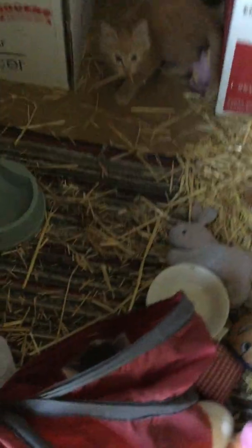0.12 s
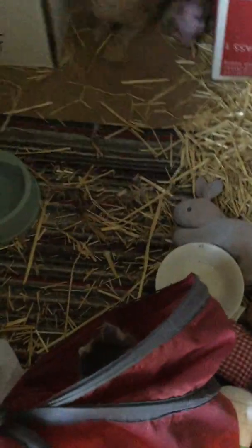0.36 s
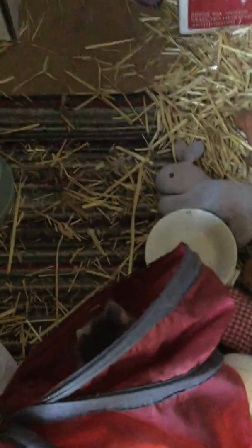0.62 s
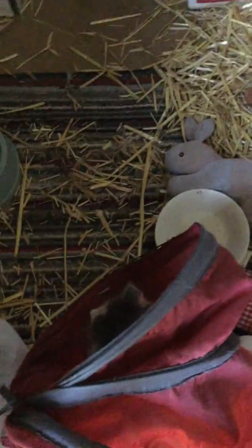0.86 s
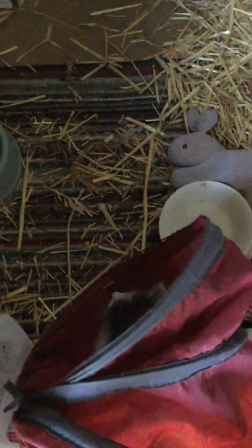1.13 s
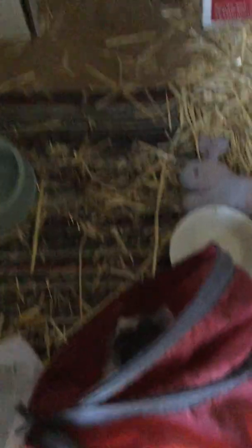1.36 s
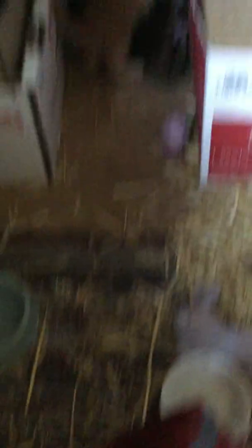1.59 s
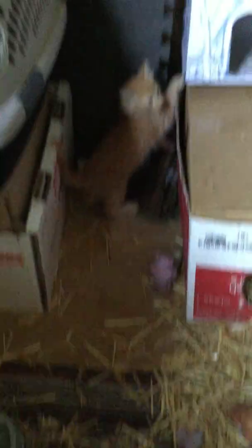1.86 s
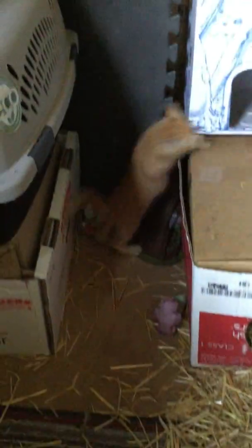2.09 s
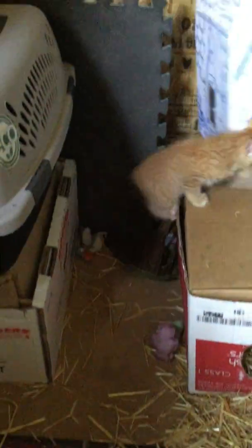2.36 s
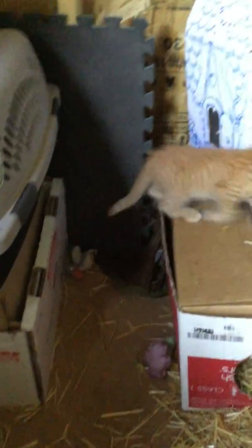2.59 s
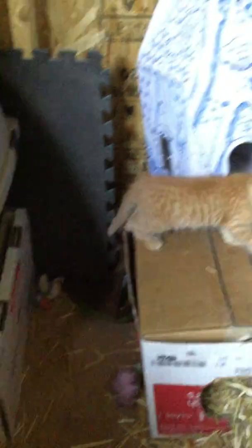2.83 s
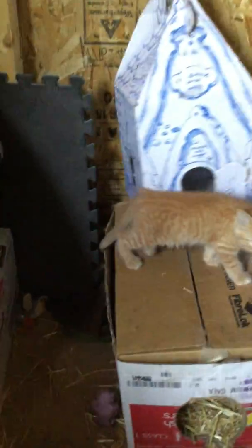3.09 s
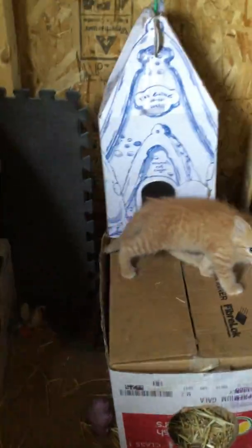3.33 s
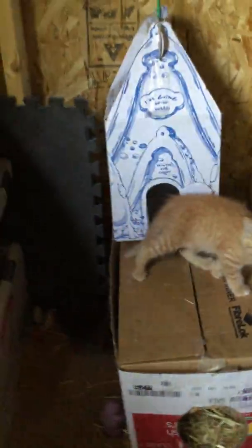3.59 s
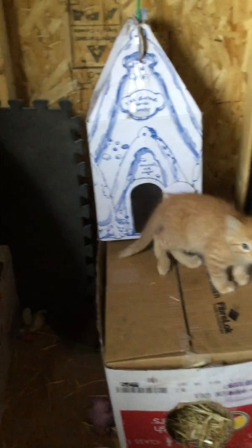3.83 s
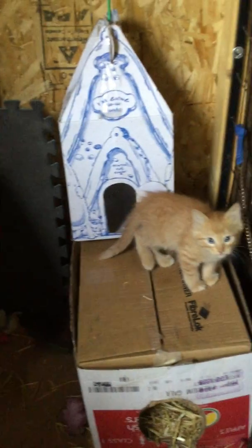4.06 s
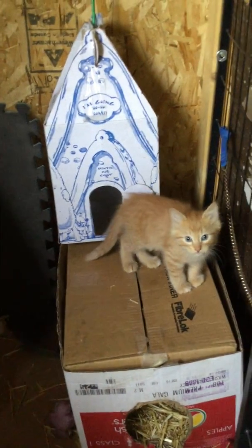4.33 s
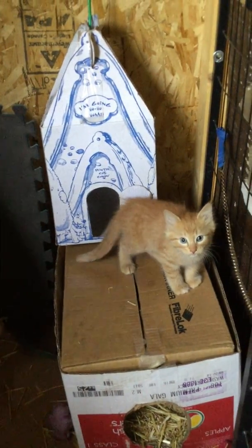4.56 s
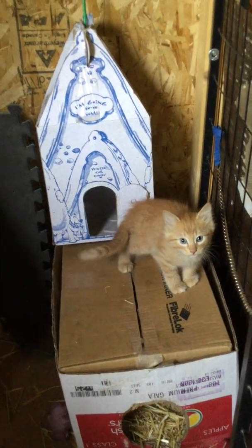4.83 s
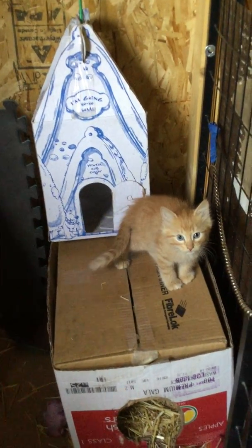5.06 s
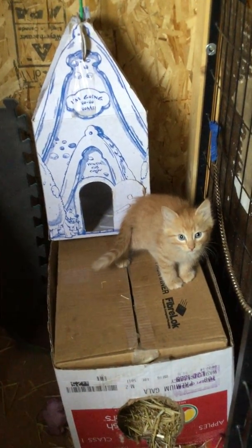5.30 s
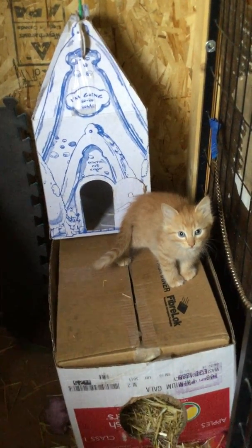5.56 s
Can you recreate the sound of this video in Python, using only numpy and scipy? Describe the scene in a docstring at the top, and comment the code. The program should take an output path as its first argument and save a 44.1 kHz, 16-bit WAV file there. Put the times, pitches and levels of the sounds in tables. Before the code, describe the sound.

Straw and a fabric bag crackle briskly near the microphone, with a very sharp snap and a boxy paw thump, then scattered small taps. After a short lull, paws scrape and thud onto a hollow cardboard box, duller and lower. Two faint scuffles follow. The end is nearly still: a soft tap, barely audible thin tones, and a weak distant rumble inside a small shed with a short tail.

```python
"""Straw and a fabric bag rustle, stalks snap, claws tick and paws thump as kittens scramble in four bouts.
The place is a small wooden shed with a hollow cardboard box; a phone microphone listens close by.
Rustles, shoves, drags and faint thin tones are shaped noise; snaps and thumps are bursts through resonances.
The walls answer with a short tail, and a low distant hum lies under everything."""
import sys
import numpy as np
from scipy import signal
from scipy.fft import rfft, irfft, next_fast_len
from scipy.io import wavfile
from scipy.ndimage import uniform_filter1d, map_coordinates

SR = 44100
rng = np.random.default_rng(int(sys.argv[2]) if len(sys.argv) > 2 else 0)


def to_linear_factor(level_db):
    """Convert decibel levels (scalar or array-like) to linear amplitude factors."""
    exponent = np.asarray(level_db, float) / 20
    return 10 ** exponent


def output_pcm(signal):
    """Save a mono or channel-first signal as 16-bit PCM at the path in sys.argv[1].

    Samples are clipped to [-1, 1] before scaling.
    """
    pcm = np.clip(np.atleast_2d(signal).T, -1, 1) * 32767
    wavfile.write(sys.argv[1], SR, np.round(pcm).astype(np.int16))


N = 250488  # length in samples


def unit(x):
    """Scales a signal to rms 1."""
    return x / np.sqrt(np.mean(x ** 2) + 1e-20)


def along(points, hz):
    """Reads a curve of (frequency, value) points on a log frequency axis."""
    f, v = np.transpose(points)
    return np.interp(np.log(hz + 1), np.log(f + 1), v)


def filtered(x, response):
    """Multiplies the spectrum of x by a complex response of frequency."""
    length = x.shape[-1]
    m = next_fast_len(length + 8192)
    spectrum = rfft(x, m) * response(np.fft.rfftfreq(m, 1 / SR))
    return irfft(spectrum, m)[..., :length]


def resonance(f, hz, width_hz):
    """One causal resonance, with gain 1 at its peak."""
    return 1j * f * width_hz / (hz * hz - f * f + 1j * f * width_hz)


def wobble(rate):
    """A smooth random curve with rate knots a second."""
    knots = rng.standard_normal(int(N * rate / SR) + 4)
    return map_coordinates(knots, [np.arange(N) * rate / SR])


def ragged_noise(length, spread_db):
    """Noise whose level jumps at random every 32 samples, like breaks of uneven size."""
    noise = rng.standard_normal(length)
    grain_db = spread_db * rng.standard_normal(length // 32 + 1)
    return noise * to_linear_factor(grain_db.repeat(32)[:length])


def crackle(spread_db, clump_db, clump_rate, hiss):
    """Dense tiny breaks of uneven size over a smooth rub, gathered in clumps."""
    breaks = unit(ragged_noise(N, spread_db))
    clumps = to_linear_factor(clump_db * wobble(clump_rate))
    return unit(clumps * (breaks + hiss * rng.standard_normal(N)))


# Four scrambles on the shed floor, one curve each. Columns: time_s, rustle_level_db, shove_level_db
SCRAMBLE_CURVES = [
    [(.21, -75.5, -56.5), (.3, -59, -80), (.39, -47, -60.5), (.43, -48.5, -45), (.49, -36.5, -34.5),
     (.56, -36, -43), (.63, -42.5, -44), (.8, -44.5, -39.5), (.825, -57.5, -50.5), (.91, -52.5, -50),
     (1.0, -61, -44), (1.055, -79, -57), (1.115, -61.5, -54), (1.19, -51.5, -53.5), (1.271, -70, -49.5),
     (1.331, -105, -61)],
    [(2.04, -105, -63), (2.129, -57, -60), (2.232, -53, -38), (2.28, -53.5, -48.5), (2.39, -44.5, -35.5),
     (2.44, -52, -48), (2.51, -58, -51.5), (2.547, -69, -54.5), (2.69, -68.5, -58.5), (2.8, -93, -65.5)],
    [(2.83, -88, -79), (2.875, -66, -75.5), (3.12, -68, -58), (3.15, -78.5, -68.5), (3.22, -100, -64.5)],
    [(3.31, -105, -59), (3.44, -76, -56.5), (3.539, -65, -56), (3.61, -93.5, -59.5), (3.74, -71, -62.5),
     (3.82, -90, -54.5), (3.92, -112, -65.5)],
]


def scrambling(column, still_db):
    """One level column as a dB value per sample, never under the level of stillness."""
    t = np.arange(N) / SR
    curves = []
    for rows in SCRAMBLE_CURVES:
        time_s, level_db = np.transpose(rows)[[0, column]]
        curves.append(np.interp(t, time_s, level_db, left=still_db, right=still_db))
    return np.max(curves, axis=0)


def stalks(count, hz, octaves, cycles, spread_db):
    """Single stalks crack at random, each a short damped ring at its own pitch."""
    draw, t = rng.random((count, 2)), np.arange(160) / SR
    pitch = np.clip(hz * 2 ** (octaves * rng.standard_normal((count, 1))), 900, 15000)
    size = to_linear_factor(spread_db * np.minimum(-np.log(draw[:, 1:] + 1e-9), 3))
    rings = size * np.sin(2 * np.pi * pitch * t) * np.exp(-pitch * t / cycles)
    where = (draw[:, :1] * N).astype(int) + np.arange(len(t))
    return unit(np.bincount(where.ravel(), rings.ravel(), N + len(t))[:N])


# Colour of rubbed straw. Columns: frequency_hz, relative_level_db
STRAW_COLOUR = [(450, -27), (800, -6), (1320, -2), (3730, -8), (6330, -9), (8980, -13), (16000, -14)]
# Treble against dull fibres. One value a scramble: treble_over_dull_db
BRIGHTNESS_DB = [4, -5.5, -10, -24.5]
# Single stalk cracks over the rub. One value a scramble: crack_share [rms ratio]
CRACK_SHARE = [0.36, 0.46, 0.038, 0.13]


def rustle():
    """Straw and fabric rub; brightness shifts the weight between dull and bright fibres."""
    rub = crackle(spread_db=3.0, clump_db=3.0, clump_rate=75, hiss=0.7)
    rub = filtered(rub, lambda f: to_linear_factor(along(STRAW_COLOUR, f)))

    # the colour shifts in patches of pitch and time as other fibres rub
    z = signal.stft(rub, nperseg=256)[2]
    patches = uniform_filter1d(rng.standard_normal(z.shape), size=4, axis=0)
    patches = unit(uniform_filter1d(patches, size=9, axis=1))
    rub = unit(signal.istft(z * to_linear_factor(2.5 * patches), nperseg=256)[1][:N])

    # each sample takes the settings of the latest scramble to have begun
    starts = [rows[0][0] for rows in SCRAMBLE_CURVES]
    which = (np.searchsorted(starts, np.arange(N) / SR, side="right") - 1).clip(0)
    cracks = stalks(count=4000, hz=5260, octaves=0.929, cycles=5.7, spread_db=4.0)
    rub = rub + np.array(CRACK_SHARE)[which] * cracks

    dull = filtered(rub, lambda f: 1 / (1 + (f / 5000) ** 2))
    bright_db = np.array(BRIGHTNESS_DB)[which]
    balanced = to_linear_factor(-bright_db / 2) * dull + to_linear_factor(bright_db / 2) * (rub - dull)
    return to_linear_factor(scrambling(column=1, still_db=-115)) * balanced


# Resonant modes of the hollow cardboard box. Columns: frequency_hz, width_hz, relative_level_db
BOX_MODES = [(131, 50, -1.5), (182, 56, 9.5), (257.5, 50, 3.5), (347.5, 55.6, -3), (420, 65, -3),
             (570, 67, -6), (699.5, 83, -9), (790, 140, -9.5), (1600, 1900, -9.5)]


def box(f):
    """The response of the cardboard box: its modes side by side."""
    return sum(to_linear_factor(db) * resonance(f, hz, width_hz) for hz, width_hz, db in BOX_MODES)


def shoves():
    """Bodies push bag and box about: lumpy low rubbing through the box modes."""
    lumps = crackle(spread_db=3, clump_db=2.5, clump_rate=42, hiss=0.53)
    # soft bodies stir little treble
    low_rub = unit(filtered(lumps, lambda f: box(f) / (1 + (f / 1000) ** 4)))
    return to_linear_factor(scrambling(column=2, still_db=-69)) * low_rub


def bursts(events, colour, grain_db, rise, t60, bite, bite_t60, kick):
    """Each event is a kick, a sharp bite and ragged noise, coloured about its own centre; times in s."""
    out, t = np.zeros(N + SR), np.arange(SR // 4) / SR
    for start_s, level_db, *tone in events:
        decay = to_linear_factor(-60 * t / t60) + bite * to_linear_factor(-60 * t / bite_t60)
        force = ragged_noise(len(t), grain_db) * decay * (1 - np.exp(-t / rise))
        force = force + kick * (t == 0)
        burst = filtered(force, lambda f: colour(f, *tone))
        out[round(start_s * SR):][:len(t)] += to_linear_factor(level_db) * burst / np.abs(burst).max()
    return out[:N]


# Snaps of stalks and claw ticks. Columns: start_s, peak_level_db, centre_hz, broad_crack_db
SNAP_EVENTS = [(0.018, -52.5, 4100, 13), (0.2518, -47.5, 4330, -16), (0.3122, -41, 1790, -12.5),
               (0.3184, -34, 3080, 14), (0.4095, -32, 2500, 28), (0.5838, -15, 8300, -15.5),
               (0.7472, -26.5, 4120, 12), (0.8964, -35.5, 4870, -10), (0.9955, -42.5, 3280, -25),
               (1.0251, -38, 7100, 7), (1.1009, -33, 6300, -2.5), (1.2321, -42, 3530, 2),
               (1.283, -51.5, 4800, -14), (1.7953, -58, 6660, -15.5), (2.142, -42.5, 2196, -3),
               (2.3511, -24.5, 2050, 0), (2.4189, -30, 3170, 19), (2.576, -30.5, 3600, 26.5),
               (2.6394, -28, 1900, -6.5), (3.336, -50, 10000, -37), (3.46, -31.5, 2860, 3),
               (3.4675, -32, 1790, -8), (3.655, -43.5, 4170, 1), (3.669, -41.5, 4620, 4),
               (3.7539, -44, 2470, -16), (3.7933, -54.5, 4200, -12), (5.0245, -44.5, 11470, -34.5)]


def snaps():
    """A snap rings at the pitch of the stalk over a broad crack."""
    def crack(f, hz, broad_db):
        ring = resonance(f, hz, min(0.75 * hz, 4500)) ** 3
        return ring + to_linear_factor(broad_db) * resonance(f, 2400, 4100)

    return bursts(SNAP_EVENTS, crack, grain_db=3.0, rise=0.00011, t60=0.04,
                  bite=2.1, bite_t60=0.0019, kick=4.0)


# Paws landing on the box. Columns: start_s, peak_level_db, centre_hz
THUMP_EVENTS = [(0.7668, -15, 420), (0.827, -29.5, 420), (0.864, -29, 139.4), (0.9725, -22.5, 660),
                (1.026, -33.5, 646), (1.102, -34, 330), (1.162, -34.5, 256), (1.232, -33.5, 557),
                (1.244, -29.5, 245), (1.49, -45.5, 450), (1.54, -38.5, 518), (2.174, -25.5, 415.4),
                (2.285, -16, 426), (2.637, -40, 570), (2.683, -40.5, 432), (3.072, -44, 480),
                (3.343, -44.5, 420), (3.402, -40, 239), (3.468, -30.5, 528), (4.59, -44, 620)]


def thumps():
    """A paw rings the box modes nearest its centre; the sharp contact also wakes the higher ones."""
    def landing(f, hz):
        near = resonance(f, hz, 1.04 * hz) ** 2
        hard = to_linear_factor(-11.5) * resonance(f, 720, 1100) ** 2  # sharp contact
        soft_pad = 1 / (1 + 1j * f / 1300) ** 2
        return box(f) * (near + hard) * soft_pad

    return bursts(THUMP_EVENTS, landing, grain_db=0.0, rise=0.00062, t60=0.084,
                  bite=0.43, bite_t60=0.0026, kick=20.7)


# Drags of claws and paws; the last row is a faint, smeared tick.
# Columns: start_s, length_s, level_db, band_hz, broad_hiss_db [relative to the band]
SCRAPE_EVENTS = [(0.46, 0.07, -43, 1970, 5), (0.575, 0.03, -33.5, 8700, -1.5), (0.841, 0.029, -50, 3630, 8),
                 (1.186, 0.023, -49, 1880, 4), (1.539, 0.062, -48.5, 296, -43),
                 (1.529, 0.049, -61.5, 1770, -29), (2.17, 0.035, -48, 1810, 5.5),
                 (2.176, 0.034, -33.5, 380, -28), (2.286, 0.035, -37.5, 2420, -3),
                 (2.31, 0.028, -39.5, 3140, 1), (2.29, 0.03, -28, 438, -22), (2.348, 0.03, -44, 2477, 8),
                 (2.359, 0.063, -31.5, 287, -19.5), (2.453, 0.03, -46.5, 2740, -1.5),
                 (2.562, 0.018, -48.5, 1900, 3), (2.723, 0.021, -60.5, 4300, -3.5),
                 (3.344, 0.086, -62.5, 2730, 5), (3.642, 0.082, -64, 4040, 2),
                 (4.579, 0.041, -73.5, 2400, -35)]


def scrapes():
    """A drag, or the smeared tick, is a narrow band of noise with a broad hiss, under one stroke."""
    out = np.zeros(N)
    catching = to_linear_factor(2.2 * wobble(90))  # a drag catches and slips
    for start_s, length_s, level_db, hz, hiss_db in SCRAPE_EVENTS:
        u = np.linspace(0, 1, round(length_s * SR))
        band, hiss = rng.standard_normal((2, len(u)))
        band = unit(filtered(band, lambda f: resonance(f, hz, 0.19 * hz + 90) * resonance(f, hz, hz) ** 3))
        hiss = unit(filtered(hiss, lambda f: to_linear_factor(along(STRAW_COLOUR, f))))
        stroke = np.minimum(1, u / 0.17) * np.minimum(1, (1 - u) / 0.55)  # quick bite, slower release
        out[round(start_s * SR):][:len(u)] += to_linear_factor(level_db) * stroke * (band + to_linear_factor(hiss_db) * hiss)
    return out * catching


# Faint narrow-band tones. Columns: start_s, length_s, level_db, pitch_hz
THIN_TONES = [(3.859, 0.14, -62.5, 566), (4.296, 0.064, -81, 1920), (4.669, 0.1, -69, 2600),
              (4.687, 0.1, -75, 1910), (5.017, 0.027, -84.5, 3126)]


def thin_tones():
    """Narrow-band noise makes a thin, unsteady tone in a fuzz of its own, which swells and fades."""
    out = np.zeros(N)
    for start_s, length_s, level_db, hz in THIN_TONES:
        def narrow(f):
            return resonance(f, hz, 0.068 * hz) ** 2 + to_linear_factor(-17) * resonance(f, hz, 0.43 * hz) ** 3

        u = np.linspace(0, 1, round(length_s * SR))
        thin = unit(filtered(rng.standard_normal(len(u)), narrow))
        out[round(start_s * SR):][:len(u)] += to_linear_factor(level_db) * np.sin(np.pi * u ** 0.69) * thin
    return out


# How fast the shed walls let sound die. Columns: frequency_hz, t60_s
WALL_DECAY = [(200, 0.15), (2000, 0.1), (10000, 0.13)]


def shed(x):
    """Each frequency of the walls' answer, a decaying noise tail, dies at its own speed."""
    hz, t, z = signal.stft(rng.standard_normal(SR // 2), SR, nperseg=256)
    decay = to_linear_factor(-60 * t / along(WALL_DECAY, hz)[:, None])
    tail = signal.istft(z * decay, SR, nperseg=256)[1]
    late = np.pad(x, (200, 0))  # the answer starts 200 samples late
    return signal.fftconvolve(late, tail / np.linalg.norm(tail))[:N]


# Colour of the hum inside the shed. Columns: frequency_hz, relative_level_db
HUM_COLOUR = [(40, -44.5), (75, -14), (125, 1.5), (200, -2), (283, -14), (330, 0), (390, -14.5),
              (450, -4.5), (512, -15), (660, -8), (793, -19), (1390, -19), (1750, -41), (2200, -53.5)]


def hum():
    """Distant low rumble that comes through the walls: coloured noise, wavering a little."""
    air = filtered(rng.standard_normal(N), lambda f: to_linear_factor(along(HUM_COLOUR, f)))
    level_db = -63 + 1.0 * wobble(22) + 1.4 * wobble(3.39)
    return to_linear_factor(level_db) * unit(air)


def scene():
    """Kittens close by, faint thin tones flickering over them, the answer of the walls, and the hum behind."""
    near = rustle() + shoves() + snaps() + thumps() + scrapes() + thin_tones()
    walls = to_linear_factor(-11.0) * shed(near)
    return (near + walls + hum())[None]


def low_pass(x):
    """Removes everything above the highest recorded frequency."""
    return signal.sosfilt(signal.butter(12, 16500, fs=SR, output="sos"), x)


def record(dry):
    """The phone microphone cuts the deep bass and the top treble."""
    def microphone(f):
        bass_cut = (1j * f / (1j * f + 105)) ** 3
        treble_cut = np.clip((16000 - f) / 300, 0, 1)  # falls to nothing over the last 300 Hz
        return bass_cut * treble_cut

    return low_pass(filtered(dry, microphone))


dry = scene()
out = record(dry)
output_pcm(out)
```